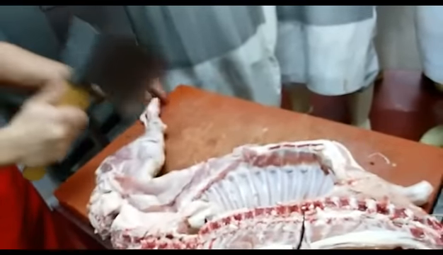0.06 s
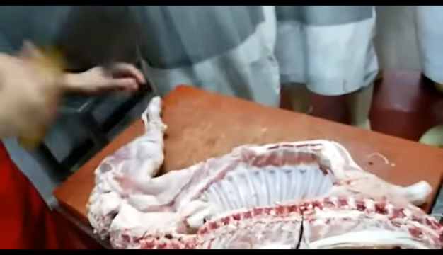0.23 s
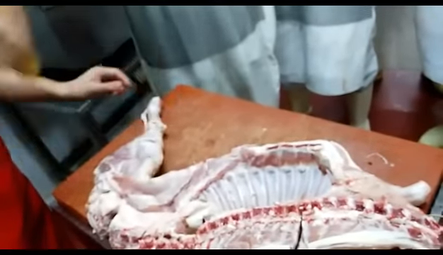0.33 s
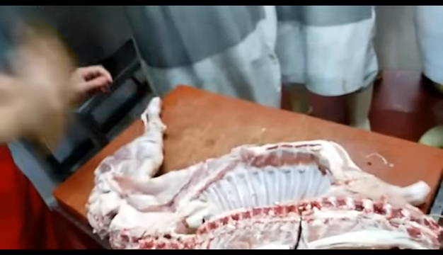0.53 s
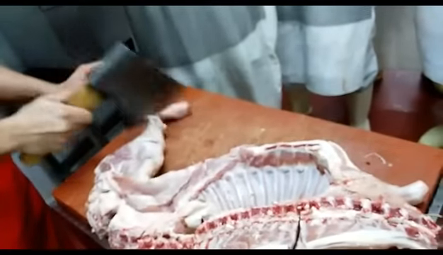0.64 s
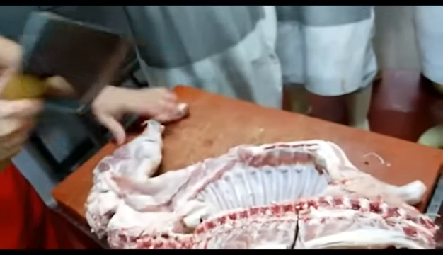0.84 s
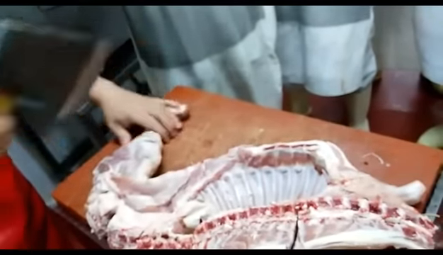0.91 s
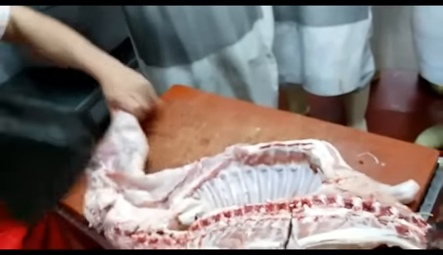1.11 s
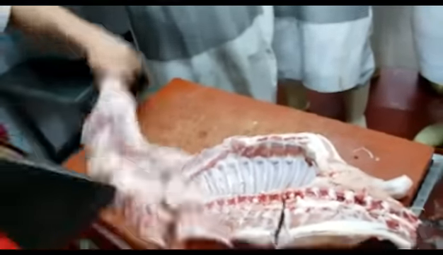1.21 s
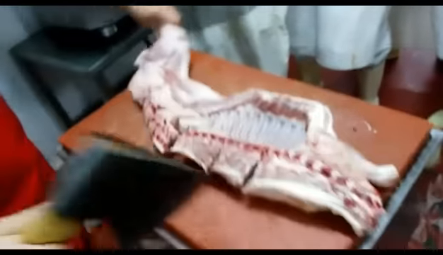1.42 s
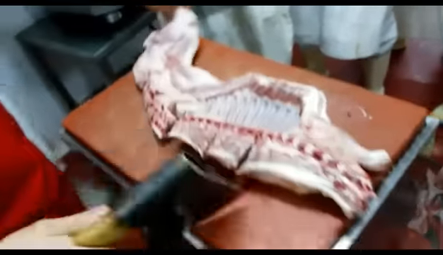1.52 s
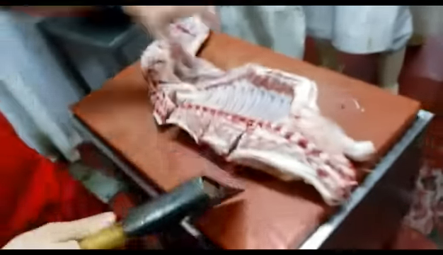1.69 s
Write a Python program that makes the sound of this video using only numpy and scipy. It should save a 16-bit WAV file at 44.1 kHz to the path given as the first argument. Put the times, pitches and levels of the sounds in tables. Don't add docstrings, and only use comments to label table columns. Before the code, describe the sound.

A heavy cleaver chop dominates: after low hum and the dying tail of an earlier blow, it splits bone and slams into wood at 0.23 s, distorted, with hard room echoes and a faint steel ring. Meat and cloth rustle softly near 0.9 s. The carcass slaps down wetly at 1.16 s, a bone bounces at 1.26, the blade knocks the block at 1.38, stopping its ring, then faint rustling.

```python
import sys
import numpy as np
from scipy import signal
from scipy.fft import rfft, irfft, next_fast_len
from scipy.io import wavfile
from scipy.ndimage import uniform_filter1d, map_coordinates

SR = 44100
rng = np.random.default_rng(int(sys.argv[2]) if len(sys.argv) > 2 else 0)


def wav_record(signal):
    frames = np.transpose(np.atleast_2d(signal))
    bounded = np.clip(frames, -1, 1)
    quanta = np.round(bounded * 32767).astype(np.int16)
    wavfile.write(sys.argv[1], SR, quanta)


def voltage_ratio(decibels):
    exponent = np.asarray(decibels, float) / 20
    return 10 ** exponent


N = 77175


def seconds():
    return np.arange(N) / SR


def unit(x):
    return x / np.sqrt(np.mean(x ** 2) + 1e-20)


def along(points, hz):
    f, value = np.transpose(points)
    return np.interp(np.log(hz + 1), np.log(f + 1), value)


def wobble(rate):
    knots = rng.standard_normal(int(N * rate / SR) + 4)
    return map_coordinates(knots, [np.arange(N) * rate / SR])


def steady(hz, t):
    return 1


# [f/Hz, left-right correlation]
LIKENESS = [(60, 1), (200, 0.93), (400, 0.69), (800, 0.34), (1500, 0.017), (15000, 0.017)]


def pair(colour, shape):
    patchy_db = 1.3
    hz, t, z = signal.stft(rng.standard_normal((2, N)), SR, nperseg=256)
    patches = uniform_filter1d(rng.standard_normal(z.shape[1:]), size=3, axis=0)
    patches = uniform_filter1d(patches, size=9, axis=1)
    z = z * voltage_ratio(patchy_db * unit(patches)) * shape(hz[:, None], t)
    noise = signal.istft(z, SR, nperseg=256)[1][:, :N]

    m = next_fast_len(N + 8192)
    f = np.fft.rfftfreq(m, 1 / SR)
    gain = voltage_ratio(along(colour, f))
    gain = gain / np.sqrt(np.mean(gain ** 2))
    turn = np.arccos(np.clip(along(LIKENESS, f), 0, 1)) / 2
    mid, side = irfft(rfft(noise, m) * gain * [np.cos(turn), np.sin(turn)], m)[:, :N]
    return np.array([mid + side, mid - side])


# [f/Hz, level/dB per Hz]
AIR = [(18, -38), (30, -4.5), (161, -5), (353, -12.5), (679, -7.5), (1410, -24), (2330, -21.5), (3830, -25),
       (15800, -38.5)]
# [f/Hz, level/dB rms]
HUM = [(49.5, -42), (99, -61)]


def room_tone():
    t = seconds()
    hum = 0
    for hz, db in HUM:
        level = np.sqrt(2) * voltage_ratio(db + 0.27 * wobble(7.3))
        hum = hum + level * np.sin(2 * np.pi * hz * t + 0.35 * wobble(4.5))
    air_db = -44 + 0.54 * wobble(4.65)
    return voltage_ratio(air_db) * pair(AIR, steady) + hum


# [t/s, level/dB]
RUSTLE = [(0, -53), (.2, -58), (.4, -72), (.7, -63), (.84, -50.5), (.9, -42.5), (.95, -48.5), (1.03, -49),
          (1.1, -66), (1.2, -28), (1.36, -73), (1.4, -42), (1.471, -40), (1.52, -40), (1.563, -36.5),
          (1.63, -48), (1.721, -50), (1.75, -54)]
# [f/Hz, level/dB per Hz]
SLIDE = [(880, -35), (1500, 0), (1560, -3), (1760, -9), (5140, -5), (7610, -8.5), (15800, -16.5)]
# [t/s, peak level/dB]
TICKS = [
    (0.8035, -43),
    (0.903, -41),
    (1.0158, -39),
    (1.0464, -53),
    (1.2594, -28.5),
    (1.6064, -42.5),
    (1.7194, -45),
]


def rustle():
    now = seconds()
    t, db = np.transpose(RUSTLE)
    effort = voltage_ratio(np.interp(now, t, db) + 0.78 * wobble(59.64) + 1.7 * wobble(400))
    ticks = sum(voltage_ratio(peak - 3.5) * np.exp(-((now - at - .001) / .0015) ** 2) for at, peak in TICKS)
    return (effort + ticks) * pair(SLIDE, steady)


def ring(modes, t, attack_s, blur):
    low_build_s = .04
    out = np.zeros((2, N))
    for k, (hz, db, t60) in enumerate(modes):
        phase = 2 * np.pi * hz * t + blur * wobble(25.21) * np.minimum(t / 0.073, 1)
        lead = rng.normal(0, 1) * np.minimum(hz / 900, 1)
        rise = 1 - np.exp(-t / (attack_s + low_build_s * (60 / hz) ** 4))
        envelope = (-1) ** k * voltage_ratio(db - 60 * t / t60) * rise
        out += envelope * np.sin([phase + lead / 2, phase - lead / 2])
    return out


# [f/Hz, t60/s]
ROOM = [(60, 1), (250, 0.82), (1000, 0.69), (4000, 0.66), (9000, 0.55), (15000, 0.35)]
NEAR = [(0.0026, 0, 0)]


def blow(row, colour, modes, echoes=NEAR, right_opens_s=0, edge=None, swell_s=.001, blur=0.75):
    start, direct_db, room_db, build_s, contact_s = row
    crack_t60_s = 0.015
    now = seconds() - start
    t = np.maximum(now, 0)

    burst = 0
    for delay, left_db, right_db in echoes:
        decay = voltage_ratio(np.array([[left_db], [right_db]]) - 60 * np.abs(now - delay) / crack_t60_s)
        burst = burst + decay * np.clip((now - delay) / contact_s, 0, 1)
    crack = voltage_ratio(direct_db) * burst * pair(edge or colour, steady)

    tail = pair(colour, lambda hz, u: voltage_ratio(-60 * np.maximum(u - start, 0) / along(ROOM, hz)))
    answer = voltage_ratio(room_db) * tail * (1 - np.exp(-t / build_s))
    reach = np.ones((2, N))
    if right_opens_s:
        reach[1] = np.clip(.07 + (t - right_opens_s) / 0.0029, .07, 1)
    return crack + reach * (answer + ring(modes, t, swell_s, blur))


# [t/s, direct level/dB, room level/dB, room build-up/s, contact/s]
BLOWS = [
    (.2305, 2, -1, 0.0092, 0.00038),
    (1.158, -16, -14, 0.004, 0.00063),
    (1.3835, -11, -21, 0.002, 0.00059),
    (1.257, -34, -30.5, 0.0072, 0.00081),
    (-.45, -60, -8.5, .01, .001),
]
CHOP, SLAP, KNOCK, BOUNCE, EARLIER = BLOWS
# [f/Hz, level/dB per Hz]
KNOCK_COLOUR = [(59, -43), (100, -13), (233, -13.5), (380, -7), (431, -6.5), (1190, -16), (1820, -17.5),
                (15800, -51)]


def earlier_chop():
    return blow(EARLIER, KNOCK_COLOUR, [])


# [f/Hz, level/dB, t60/s]
BLADE = [(1475, -38, 2.84), (1504, -44.5, 3.7), (1576, -49, 2.9)]


def blade():
    damped_s, earlier_db = 1.4, -10.5
    now = seconds()
    struck = ring(BLADE, np.maximum(now - CHOP[0], 0), .002, blur=0.24)
    struck *= np.clip((damped_s - now) / .03 + 1, 0, 1)
    left_over = voltage_ratio(earlier_db) * ring(BLADE, now - EARLIER[0], .002, blur=.15)
    return struck + left_over * (now < CHOP[0])


# [f/Hz, level/dB per Hz]
CHOP_COLOUR = [(24, -16), (40, -17), (248, -8), (596, -10.5), (642, -8.5), (1360, -13.5), (7450, -15.5),
               (15800, -22.5)]
# [f/Hz, level/dB per Hz]
CRACK = [(59, -37), (100, -10.5), (440, 0), (1900, -12.5), (2960, -10), (6620, -11), (13900, -17),
         (15800, -26)]
# [f/Hz, level/dB, t60/s]
CHOP_MODES = [(57.8, -17, 0.51), (147.5, -17.5, 0.88), (243.5, -12, 0.63), (336.6, -22, 0.48),
              (458, -17.5, 0.49), (643, -14, 0.59), (856, -16, 0.35), (966, -22, 0.74)]
# [f/Hz, level/dB, t60/s]
EDGE = [(1667, -7, 0.052)]
# [delay/s, left level/dB, right level/dB]
WALLS = [
    (0, -7, -8.5),
    (.003, 8, 4.5),
    (.008, 5, -11),
    (0.0149, 3, 4),
    (0.0234, 3, -26),
]


def chop():
    body = blow(CHOP, CHOP_COLOUR, CHOP_MODES, WALLS, right_opens_s=0.026, edge=CRACK, swell_s=0.035)
    since = np.maximum(seconds() - CHOP[0], 0)
    return body + ring(EDGE, since, 0.00035, blur=.5)


# [f/Hz, level/dB per Hz]
SLAP_COLOUR = [(24, -46), (40, -27), (136, -8.5), (203, -13.5), (371, -12), (1110, -19), (2740, -22.5),
               (15800, -56)]
# [f/Hz, level/dB, t60/s]
SLAP_MODES = [(58.9, -20.5, 0.7), (145.8, -9, 0.12), (250, -12.5, .09), (127.4, -22, 0.96),
              (538, -14, 0.11), (194, -25, .06), (641, -16, .14), (299, -23.5, 0.85), (361, -28.5, 1),
              (1036, -22, 0.11), (4410, -33, 0.31), (800, -27.5, 0.38)]


def slap():
    return blow(SLAP, SLAP_COLOUR, SLAP_MODES, edge=CRACK, swell_s=0.0011)


# [f/Hz, level/dB per Hz]
SPLAT = [(880, -51), (1500, -11), (1960, -6), (2760, -5), (4180, -10), (11700, -18.5), (15800, -25)]


def splat():
    peak_s, rise_s, t60_s = 1.186, .012, .15
    t = seconds() - peak_s
    envelope = np.where(t < 0, np.exp(-(t / rise_s) ** 2), voltage_ratio(-60 * np.abs(t) / t60_s))
    return voltage_ratio(-18.5) * envelope * pair(SPLAT, steady)


def bounce():
    return blow(BOUNCE, SPLAT, [])


# [f/Hz, level/dB, t60/s]
KNOCK_MODES = [(237.5, -30, 0.87), (305, -23.5, 0.7), (375.4, -17.5, 0.74), (459, -30.5, 0.2),
               (548, -20, 0.21), (624, -22.5, 0.13), (712, -28, 0.27), (857, -28.5, 0.53),
               (1873, -27, 0.22), (2410, -33, .14)]


def knock():
    return blow(KNOCK, KNOCK_COLOUR, KNOCK_MODES, swell_s=.002, blur=.3)


def scene():
    impacts = earlier_chop() + blade() + chop() + slap() + bounce() + knock()
    return room_tone() + rustle() + impacts + splat()


def roll_off(x):
    return signal.sosfilt(signal.butter(12, 15930, fs=SR, output="sos"), x)


# [f/Hz, level/dB]
MIC = [(900, -0.2), (1350, -1), (1700, -1), (3100, 1), (4500, -3.5), (7000, 0.5), (10000, -0.8)]
# [f/Hz, left minus right level/dB]
PORTS = [(60, -1.1), (380, 0.7), (700, 0), (1290, -3.5), (2380, -1.4), (5000, 1), (9000, -1.8),
         (15000, -5.5)]
# [from t/s, to t/s]
STARVED = [(.2135, .227)]


def record(dry):
    low_cut_hz, starved_hz = 47.5, 2500
    threshold, release_db_per_s, grip, knee = .75, 1500, .55, 4.5
    now = seconds()
    m = next_fast_len(N + 8192)
    f = np.fft.rfftfreq(m, 1 / SR)
    low_cut = (1j * f) ** 2 / ((1j * f) ** 2 + 1.2j * f * low_cut_hz + low_cut_hz ** 2)
    colour = voltage_ratio(along(MIC, f) + np.outer([.5, -.5], along(PORTS, f)))
    x = irfft(rfft(dry, m) * low_cut * colour, m)[:, :N]

    starved = sum(np.clip(np.minimum(now - a, b - now) / .002, 0, 1) for a, b in STARVED)
    treble = rfft(x * (starved > 0), m) * np.clip(f / starved_hz - .5, 0, 1)
    x = x - starved * irfft(treble, m)[:, :N]

    ramp = release_db_per_s * now
    over_db = np.maximum(20 * np.log10(np.abs(x) / threshold + 1e-9), 0)
    cut_db = np.maximum.accumulate(over_db + ramp, axis=1) - ramp
    x = x * voltage_ratio(-cut_db * grip)
    mix = x / (1 + np.abs(x) ** knee) ** (1 / knee)
    return roll_off(mix)


dry = scene()
out = record(dry)
wav_record(out)
```